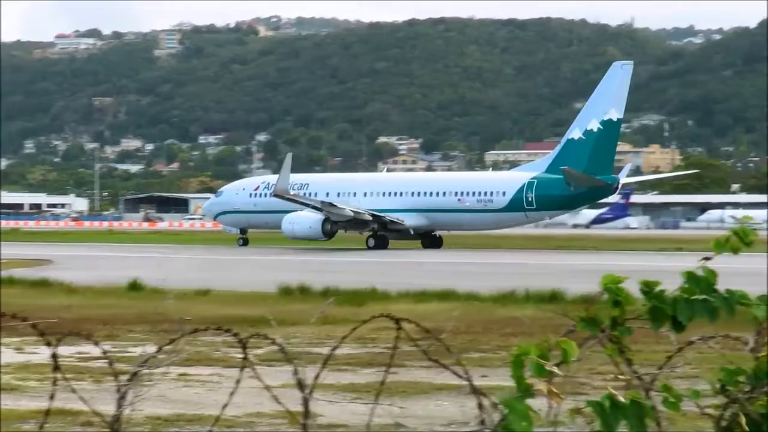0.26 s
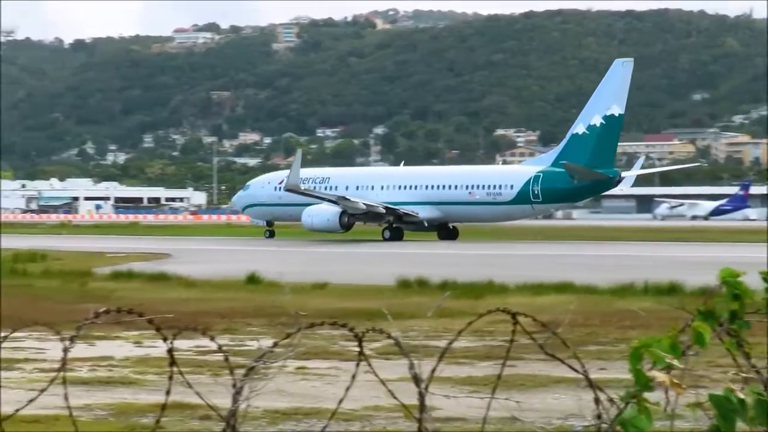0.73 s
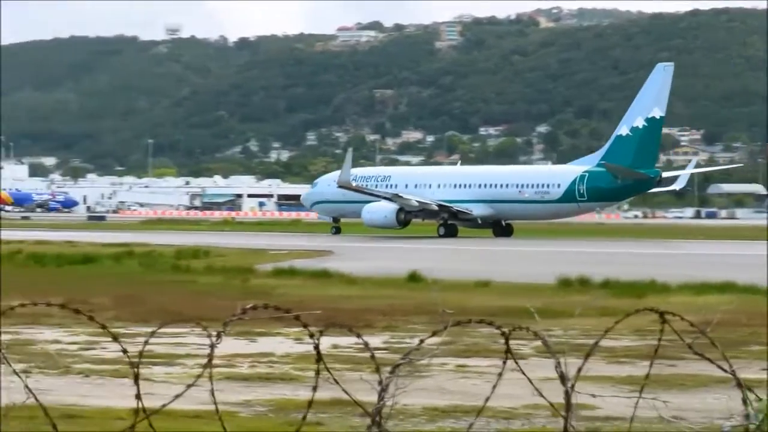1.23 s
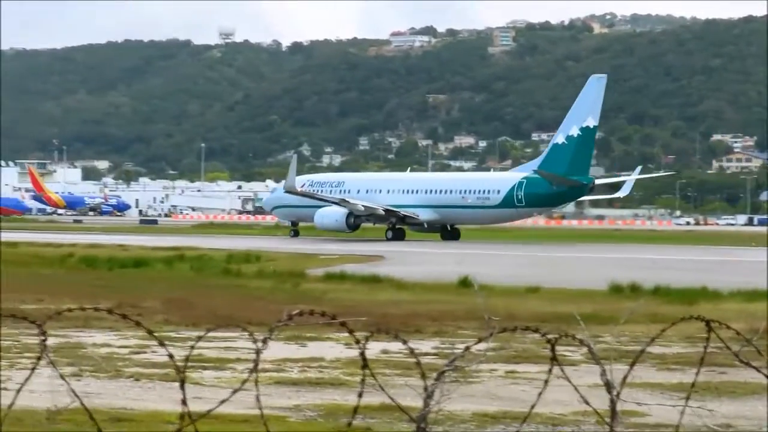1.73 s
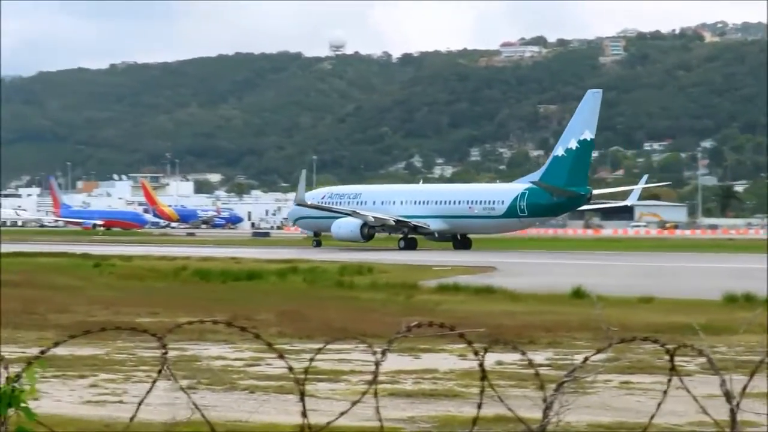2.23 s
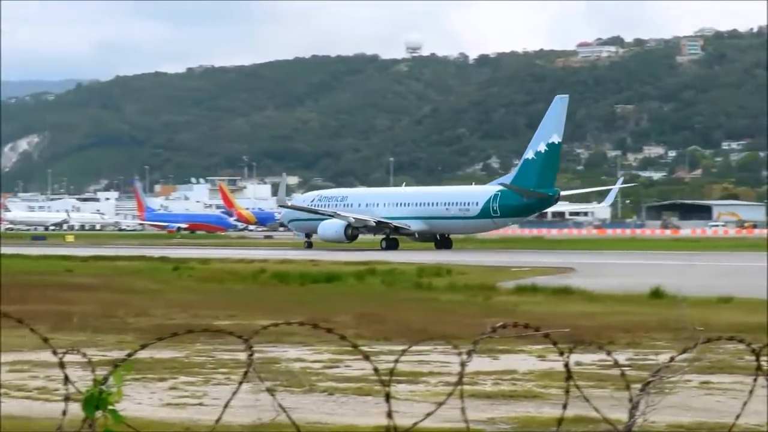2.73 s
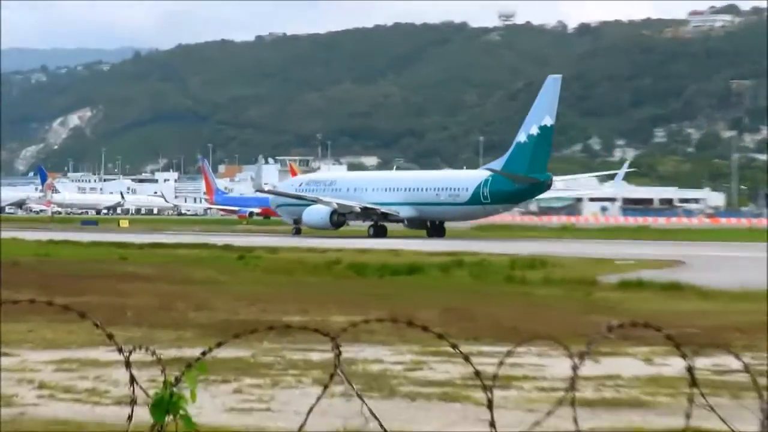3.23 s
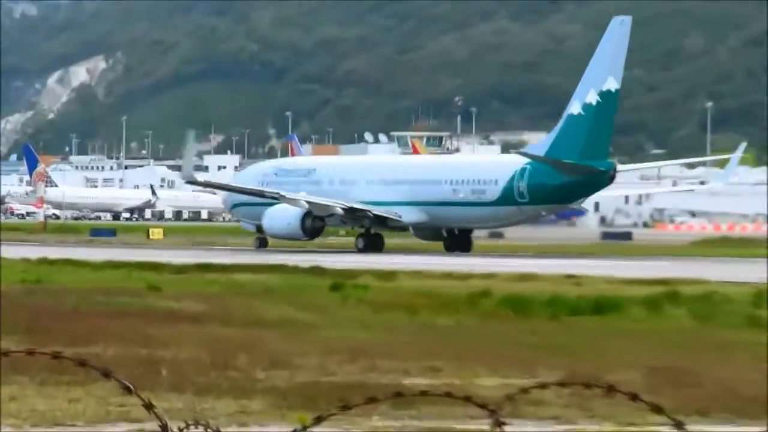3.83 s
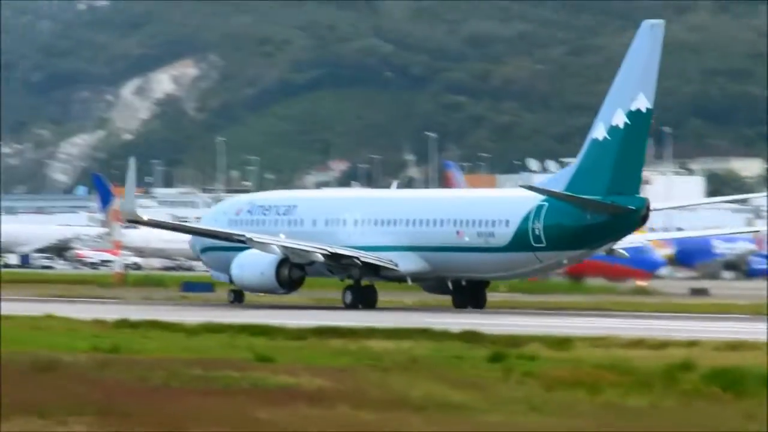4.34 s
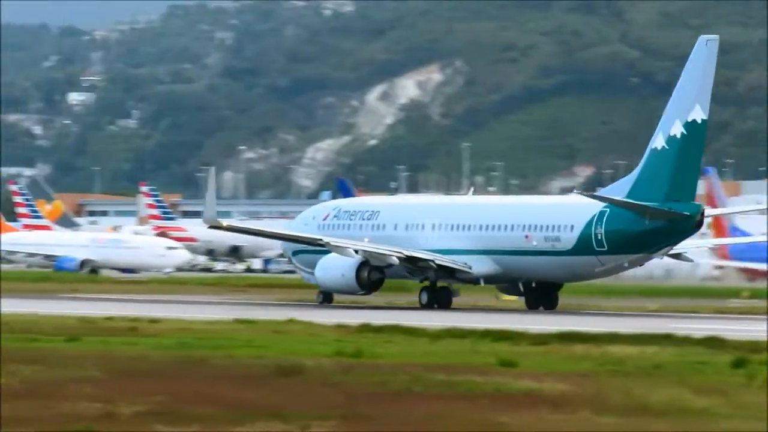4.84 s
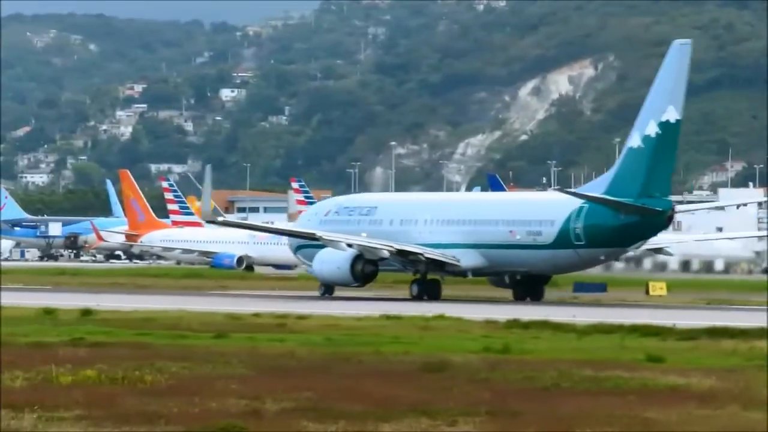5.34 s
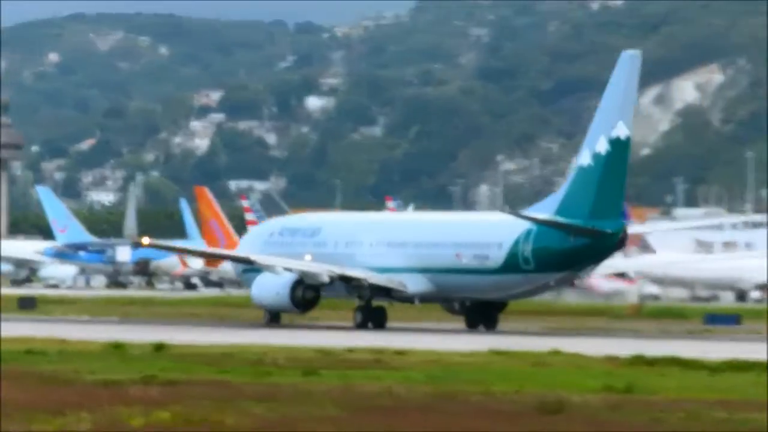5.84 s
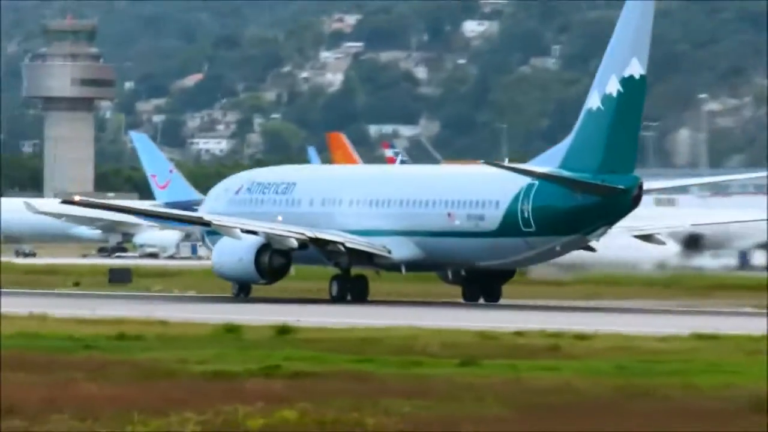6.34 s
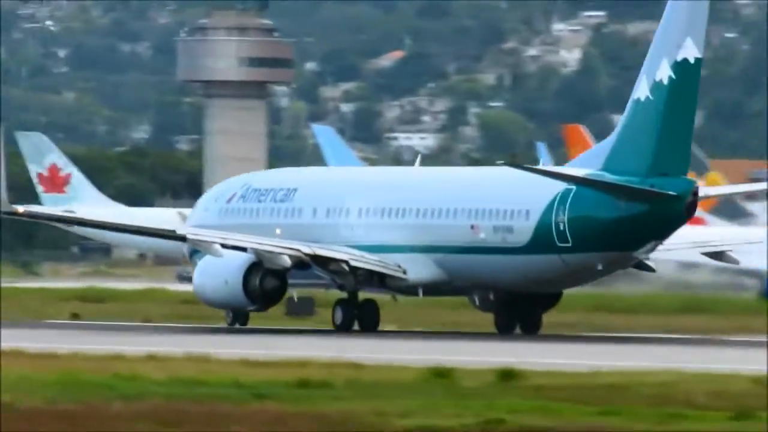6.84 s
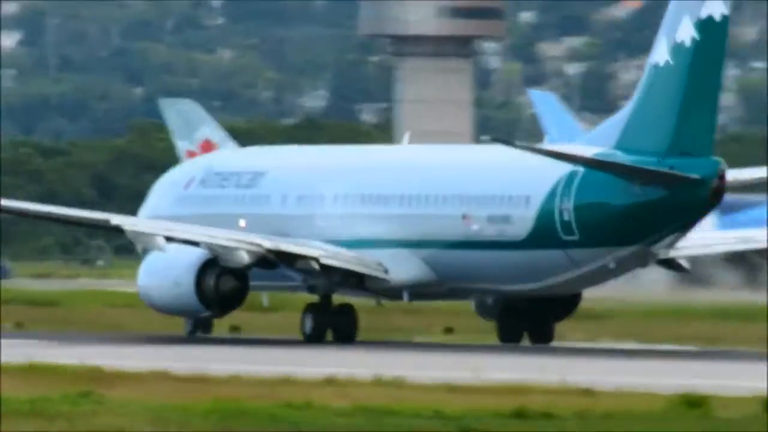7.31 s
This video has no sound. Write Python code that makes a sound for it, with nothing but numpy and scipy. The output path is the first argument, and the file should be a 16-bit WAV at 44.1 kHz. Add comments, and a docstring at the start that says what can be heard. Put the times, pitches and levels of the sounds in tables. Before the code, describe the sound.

Across an open airfield, a departing jet's broad roar and thin high whine give way to deepening rumble, broken by rough thumping wind gusts.

```python
"""A twin-engine jet airliner rolls away down a runway at takeoff thrust, heard across the field by a small camera.
First come exhaust roar, shimmering hiss and a sinking fan whine that carries clearest near 0.6 s and 1.65 s.
Gusts buffet the two microphone ports, strongly from about 1.3 s, with a tiny tick at 4.36 s; until 5.65 s rumble
grows over roar as the tail swings toward the listener, and treble dulls as the jet recedes. Roar, hiss and rumble
are shaped noises, the whine two sines, eddies short decaying sines; the housing cuts fixed notches throughout."""
import sys
import numpy as np
from scipy import signal
from scipy.fft import rfft, irfft, next_fast_len
from scipy.io import wavfile
from scipy.ndimage import uniform_filter1d, minimum_filter1d, map_coordinates

SR = 44100
rng = np.random.default_rng(int(sys.argv[2]) if len(sys.argv) > 2 else 0)


def master(y):
    """Save y as 16-bit WAV."""
    cut = np.clip(np.atleast_2d(y).T, -1, 1)
    pcm = np.round(cut * 32767)  # scale
    wavfile.write(sys.argv[1], SR, pcm.astype(np.int16))


N = 333829

# Relative noise spectra of exhaust roar, hiss and rumble. Each row: frequency in Hz, density in dB per Hz.
ROAR_SPECTRUM = [(71, -59), (120, -9.5), (214, -0.5), (274, -5), (426, -1), (540, -5), (720, -1),
                 (900, 0.5), (1030, -4.5), (1150, -10), (1310, -7.5), (1650, -8), (1820, -9), (1950, -14.5),
                 (2400, -17), (3120, -35), (5280, -120)]
HISS_SPECTRUM = [(1800, -17.5), (2500, -6.5), (3200, 3.5), (4400, 0.5), (5500, -12.5), (7300, -11.5),
                 (8500, -20), (10800, -29.5), (12300, -35), (14400, -50.5), (15700, -85)]
RUMBLE_SPECTRUM = [(15, -50.5), (30, -26), (50, -9.5), (80, 4.5), (110, 7), (150, -2.5), (220, -49),
                   (600, -120)]
# Base level of the roar over the slow hiss level. Each row: time in seconds, level in dB.
ROAR_OVER_HISS = [(0, 15), (1.5, 14), (2.5, 14), (3.6, 14.5), (4.2, 17.5), (4.55, 19.5), (4.75, 17),
                  (5.6, 15), (6.2, 12.5), (6.7, 17), (7.15, 17.5), (7.57, 14)]
# Gain of the roar's low part, rising overall, with a lull near 5.3 s and a slight final drop.
# Each row: time in seconds, gain in dB.
BOOM_GAIN = [(0, -5.5), (1.2, -1.5), (4.6, -0.5), (5.3, -2), (6.0, -0.5), (6.6, 3.5), (7.57, 2.5)]
# Drifting weight of the roar's middle part.
# Each row: time in seconds, gain of its low third in dB, gain of its top third in dB.
GROWL_GAIN = [(0, 0.5, 1.5), (2.4, -0.5, -1.5), (3.3, -2, 2), (5.9, 3.5, -3), (7.0, 6.5, -5)]
# Gain of the roar's part above 1130 Hz. Each row: time in seconds, gain in dB.
BARK_GAIN = [(1.5, 0), (3.5, 1.1), (5.0, -3.2), (5.7, 0), (6.0, 1.5), (7.0, -0.1)]
# Lag of the bounce off the grass. Each row: time in seconds, lag in seconds.
GROUND_LAG = [(2.5, 0.0013), (3.6, 0.0023), (7.57, 0.003)]
# Base level of the hiss, swelling in moving air and dropping after gusts.
# Each row: time in seconds, level in dB.
HISS_LEVEL = [(0.0, -29.5), (0.19, -28.5), (0.34, -33.5), (0.59, -31.5), (0.65, -27), (0.84, -31),
              (1.01, -25.5), (1.16, -31.5), (1.35, -30.5), (1.39, -37), (1.71, -29), (1.92, -33),
              (2.59, -28), (2.68, -32), (2.89, -36.5), (3.14, -31.5), (3.44, -33.5), (3.77, -28.5),
              (4.15, -35.5), (4.49, -32), (4.6, -35.5), (4.64, -41), (5.16, -39.5), (5.21, -45),
              (5.92, -38.5), (6.08, -32.5), (6.24, -37), (7.15, -35), (7.24, -38), (7.42, -32.5),
              (7.49, -41.5), (7.57, -38)]
# Moments when the whine comes forward or recedes. Each row: centre in seconds, gain in dB.
WHINE_FLARES = [(.1, 4), (.35, -9), (.47, 6), (.64, 12.5), (1.65, 14)]
# Notches of the housing. Each row: centre in Hz, full width at half depth in Hz, gain in dB.
HOUSING_NOTCHES = [(1130, 170, -3), (2702, 220, -7), (5924, 620, -13.5), (9120, 1040, -14.5),
                   (12800, 560, -10.5)]
# Difference between the ports.
# Each row: frequency in Hz, level in dB re the source, phase in rad, power share tied to the source (0-1).
PORT_DIFFERENCE = [(30, -25.5, 0, .1), (100, -46.5, 0, .1), (1000, -120, -.2, .1),
                   (1330, -39.5, -0.088, .4), (2220, -9, -0.91, 0.9), (3250, -26, -1.2, .5),
                   (4450, -11, -0.98, .75), (5400, -14, -1.2, .6), (6200, -10.5, -1.4, .7),
                   (8500, -12, -1.1, .2), (10000, 1, -1.3, .55), (12100, -2.5, -1.4, .3),
                   (14000, 4, -1.4, .6)]
# Gusts on the ports. Each row: start of the hold in seconds, hold in seconds, held level in dB.
GUSTS = [(0.312, 0.015, -29), (1.296, 0.12, -20.5), (1.447, 0.067, -21), (1.803, 0.16, -33.5),
         (2.626, 0.049, -19.5), (2.756, .09, -19.5), (2.902, 0.28, -22.5), (3.276, 0.023, -17.5),
         (4.055, .01, -21), (4.497, 0.18, -19.5), (4.74, .22, -21), (5.013, 0.089, -15),
         (5.156, 0.025, -14), (5.204, 0.091, -22), (5.606, 0.054, -25), (6.128, 0.073, -27.5),
         (6.287, 0.029, -29.5), (6.445, 0.021, -23.5), (6.75, 0.11, -26.5), (7.22, 0.19, -32.5),
         (7.45, 0.086, -18)]
# Relative spectra of the buffeting and of its bright edge. Each row: frequency in Hz, density in dB per Hz.
BUFFET_SPECTRUM = [(40, -49), (170, -11), (370, -4.5), (520, -9), (800, -23.5), (1500, -48), (8000, -120)]
RIP_SPECTRUM = [(300, -31), (600, 7.5), (900, -1), (1500, -6.5), (2200, -21.5), (4500, -35), (12000, -120)]
# Gust edges tearing past. Each row: centre in seconds, level in dB, half length (to 1/e) in seconds.
RIPS = [(1.357, -17.5, .016), (2.63, -20, .02), (2.847, -15, .004), (2.893, -16, .018), (4.5, -21, .05),
        (4.612, -17, .014), (5.17, -16, .016), (5.215, -24, .02)]
# Single eddies. Each row: start in seconds, envelope peak in dB, frequency in Hz.
EDDIES = [(1.227, -4.5, 434), (1.278, -11, 800), (1.287, -4, 680), (1.337, -9.5, 603), (1.351, -1, 1250),
          (1.36, -8, 720), (1.394, -13.5, 430), (1.431, -9, 390), (1.46, -7, 450), (2.594, -10, 396),
          (2.606, -8, 316), (2.65, -7, 600), (2.749, 0, 625), (2.789, -13, 600), (2.844, 2, 603),
          (2.848, -3, 1300), (2.883, -7, 1140), (2.995, -9, 875), (3.01, -9, 420), (3.117, -11, 404),
          (3.271, -3.5, 387), (4.545, -12, 258), (4.607, -2, 465), (4.617, -7.5, 380), (4.933, -11, 420),
          (5.046, -15, 460), (5.092, -12, 350), (5.103, -7, 376), (5.154, -3.5, 606), (5.173, -5, 300),
          (5.194, -9, 500), (5.264, -16, 470), (5.627, -14.5, 330), (5.67, -10, 380), (5.686, -11.5, 334),
          (6.143, -14, 328), (6.5, -7.5, 300), (7.166, -13, 620), (7.456, -7.5, 337), (7.48, -9, 328),
          (7.504, -10, 300), (7.531, -9, 380), (7.54, -13.5, 330)]
# Gain of the wind's difference between ports. Each row: frequency in Hz, gain in dB.
WIND_SIDE = [(100, -50), (250, -21.5), (500, -15.5), (1200, -3)]
# A tiny tick close by. One row: start in seconds, starting level in dB before its lows are removed.
TICK = (4.359, -41)

SWING_S = 5.65  # the tail swings toward the camera until then
RUMBLE_START_DB, RUMBLE_SWING_DB = -26.5, 16  # over the roar at the start; change by the end of the swing
TREBLE_START_DB, TREBLE_DULLING_DB = 9, -11  # gain at the start; change over the same time
WHINE_START_HZ, WHINE_SINK_HZ_S = 3678, 26  # blade tone, sinking as the jet speeds away (Hz, Hz per s)
WHINE_START_DB, WHINE_FADE_DB_S = -13.5, 1.2  # re the slow hiss level, then fading (dB, dB per s)
FLARE_S = .075  # half length to 1/e
GUST_RISE_DB_S, GUST_FALL_DB_S, BREEZE_DB = 174, 253, -57  # slopes around the hold; level between gusts
LIMIT, TOP_HZ = .82, 15760  # peak ceiling (1 is full scale), band limit


def amp(db):
    """Amplitude is ten to the power of the level over twenty."""
    return 10 ** (np.asarray(db) / 20)


def unit(x):
    """Division by the root mean square gives rms 1."""
    return x / np.sqrt(np.mean(x ** 2) + 1e-20)


def along(points, hz):
    """Interpolation on a logarithmic frequency axis, for each column after the frequency."""
    f, *columns = np.transpose(points)
    return np.squeeze([np.interp(np.log(hz + 1), np.log(f + 1), c) for c in columns])


def curves(rows):
    """Linear interpolation in time gives one value per sample for each column after the time."""
    s, *columns = np.transpose(rows)
    return np.squeeze([np.interp(np.arange(N) / SR, s, c) for c in columns])


def wobble(rate):
    """Spline interpolation of random knots, rate of them a second, makes a smooth random curve."""
    knots = rng.standard_normal(int(N * rate / SR) + 4)
    return map_coordinates(knots, [np.arange(N) * rate / SR])


def filtered(x, response):
    """Convolution is a product of spectra; mirrored ends soften the edges."""
    pad = SR // 8
    m = next_fast_len(N + 2 * pad)
    wide = np.concatenate([x[..., pad:0:-1], x, x[..., :-pad - 1:-1]], axis=-1)
    spectrum = rfft(wide, m) * response(np.fft.rfftfreq(m, 1 / SR))
    return irfft(spectrum, m)[..., pad:pad + N]


def split(x, edge_hz):
    """A soft low-pass and its remainder sum to the original."""
    low = filtered(x, lambda hz: 1 / (1 + (hz / edge_hz) ** 6))
    return low, x - low


def rush(spectrum, patchy_db, channels=2):
    """Turbulence as unrelated noises of one colour, rms 1, sharing patches of random gain."""
    z = signal.stft(rng.standard_normal((channels, N)), nperseg=512)[2]
    field = uniform_filter1d(rng.standard_normal(z.shape[1:]), size=8, axis=0)  # smooth over frequency
    field = uniform_filter1d(field, size=14, axis=1)  # and over time
    noise = signal.istft(z * amp(patchy_db * unit(field)), nperseg=512)[1][:, :N]
    return unit(filtered(noise, lambda hz: amp(along(spectrum, hz))))


def bounced(x):
    """Interference: soft ground returns the lows a little late, cutting a dip that sinks as the lag grows."""
    late = np.arange(N) - curves(GROUND_LAG) * SR
    soft = split(x, edge_hz=280)[0]
    return x + amp(-3.5) * np.array([np.interp(late, np.arange(N), row) for row in soft])


def exhaust_roar(roar_db, swell_db, shimmer):
    """Jet mixing noise: broadband turbulence, whose upper parts tear in small shocks."""
    low, bark = split(rush(ROAR_SPECTRUM, patchy_db=1.0), edge_hz=1130)
    boom, growl = split(low, edge_hz=540)
    deep, high = split(growl, edge_hz=740)
    middle, upper = split(high, edge_hz=920)
    deep_db, upper_db = curves(GROWL_GAIN)
    growl = amp(deep_db) * deep + middle + amp(upper_db) * upper
    coarse = unit(amp(1.2 * wobble(100)))
    fine = unit(amp(1.1 * wobble(120)))
    body = amp(curves(BOOM_GAIN)) * bounced(boom)
    body += coarse * growl
    body += amp(curves(BARK_GAIN)) * fine * bark
    return amp(roar_db + 0.47 * swell_db + 0.41 * shimmer) * body


def hiss(hiss_db, swell_db, shimmer, progress):
    """Turbulent air modulates high-frequency noise, the treble most; treble dulls as the jet recedes."""
    near, top = split(rush(HISS_SPECTRUM, patchy_db=1.1), edge_hz=7500)
    treble_db = TREBLE_START_DB + TREBLE_DULLING_DB * progress + 0.3 * swell_db + 1.1 * wobble(3.7)
    return amp(hiss_db + 0.45 * shimmer) * (near + amp(treble_db) * top)


def rumble(roar_db, swell_db, swing):
    """Directivity: the lowest exhaust noise gains on the roar as the tail swings round."""
    rumble_db = roar_db + RUMBLE_START_DB + RUMBLE_SWING_DB * swing + 0.29 * swell_db
    return amp(rumble_db + 1.4 * wobble(4.0)) * rush(RUMBLE_SPECTRUM, patchy_db=1.24)


def fan_whine(slow_db, swell_db):
    """A fan radiates its blade tone and octave; pitch sinks as the jet speeds away."""
    now = np.arange(N) / SR
    pitch_hz = WHINE_START_HZ - WHINE_SINK_HZ_S * now + 5 * wobble(35)
    phase = 2 * np.pi * np.cumsum(pitch_hz) / SR
    whine_db = slow_db + WHINE_START_DB - WHINE_FADE_DB_S * now + swell_db
    whine_db += sum(db * np.exp(-((now - s) / FLARE_S) ** 2) for s, db in WHINE_FLARES)
    tone = np.sin(phase) + amp(-16) * np.sin(2 * phase)
    return np.sqrt(2) * amp(whine_db + 1.5 * wobble(45)) * tone


def jet():
    """Superposition of exhaust and fan: row 0 is direct, row 1 an unrelated copy scattered by the field."""
    hiss_db = curves(HISS_LEVEL)
    slow_db = uniform_filter1d(hiss_db, size=SR)  # one-second mean
    swell_db = hiss_db - slow_db  # quick changes reach the roar in part
    roar_db = slow_db + curves(ROAR_OVER_HISS)
    progress = np.clip(np.arange(N) / SR / SWING_S, 0, 1)
    shimmer = wobble(9)  # turbulent air flickers roar and hiss together
    noise = exhaust_roar(roar_db, swell_db, shimmer)
    noise += hiss(hiss_db, swell_db, shimmer, progress)
    noise += rumble(roar_db, swell_db, swing=progress)
    return noise + fan_whine(slow_db, swell_db) * [[1], [0]]  # the whine is direct only


def housing(sound):
    """Diffraction at the two ports: the housing notches the mid, its shadow makes the side."""
    def notches(hz):
        """Losses of the separate notches add in dB."""
        return amp(sum(db / (1 + ((hz - mid_hz) / width_hz * 2) ** 2)
                       for mid_hz, width_hz, db in HOUSING_NOTCHES))

    def shadow(hz):
        """Partial coherence: one power share follows the direct sound, the rest the scattered copy."""
        db, phase, share = along(PORT_DIFFERENCE, hz)
        share = np.clip(share, 0, 1)
        return amp(db) * np.array([np.sqrt(share) * np.exp(1j * phase), np.sqrt(1 - share) + 0j])

    mid = filtered(sound[0], notches)
    side = filtered(sound, shadow).sum(axis=0)
    return np.array([mid, side])


def gusting():
    """Gust envelope in dB: each gust rises, holds and falls back, and the strongest prevails."""
    now = np.arange(N) / SR
    shapes = []
    for s, hold, db in GUSTS:
        rise_db = GUST_RISE_DB_S * np.maximum(s - now, 0)
        fall_db = GUST_FALL_DB_S * np.maximum(now - s - hold, 0)
        shapes.append(db - rise_db - fall_db)
    return np.maximum(np.max(shapes, axis=0), BREEZE_DB)


def add_eddies(gusts):
    """A passing vortex gives a brief pressure oscillation, unequal at the two ports."""
    t = np.arange(SR // 40) / SR
    for s, db, hz in EDDIES:
        u = t * hz / 0.62  # an eddy lasts about two cycles
        eddy = amp(db) * u * np.exp(1 - u) * np.sin(2 * np.pi * hz * t)
        side_gain = rng.standard_normal()
        gusts[:, round(s * SR):][:, :len(t)] += eddy * np.array([[1], [side_gain]])


def wind():
    """Turbulent pressure on the ports, as mid and side: lumpy low noise, a bright tearing edge, eddies."""
    wind_db, now = gusting(), np.arange(N) / SR
    lumps = unit(amp(1.24 * wobble(45) + 1.45 * wobble(110)))
    gusts = amp(wind_db) * lumps * rush(BUFFET_SPECTRUM, patchy_db=0.5)
    tearing = amp(wind_db - 10.5) * lumps
    tearing += sum(amp(db) * np.exp(-((now - s) / half) ** 2) for s, db, half in RIPS)
    gusts += tearing * rush(RIP_SPECTRUM, patchy_db=4.0)
    add_eddies(gusts)
    side = filtered(gusts[1], lambda hz: amp(along(WIND_SIDE, hz)))
    return np.array([gusts[0], side])


def tick():
    """An impulse as decaying noise of a few milliseconds, thinned by a high-pass, different at each port."""
    start_s, level_db = TICK
    click, t = np.zeros((2, N)), np.arange(SR // 100) / SR
    decay = amp(level_db - 60 * t / .012)  # 60 dB in 12 ms
    click[:, round(start_s * SR):][:, :len(t)] = decay * rng.standard_normal((2, len(t)))
    return split(click, edge_hz=8500)[1]


def scene():
    """Stereo decomposition: left is mid plus side, right is mid minus side."""
    mid, side = housing(jet()) + wind()
    return np.array([mid + side, mid - side]) + tick()


def record(dry):
    """Peak limiting: gain falls just ahead of loud peaks and holds for a moment; a band limit follows."""
    needed = np.minimum(1, LIMIT / (np.abs(dry).max(axis=0) + 1e-9))
    ahead, hold = SR // 500, SR // 40
    held = minimum_filter1d(needed, size=ahead + hold, origin=(hold - ahead) // 2)
    gain = uniform_filter1d(held, size=ahead)
    fade = np.minimum(1, (N - np.arange(N)) / (SR / 100))  # the last 10 ms fade out
    return filtered(dry * fade * gain, lambda hz: hz < TOP_HZ)


dry = scene()
out = record(dry)
master(out)
```